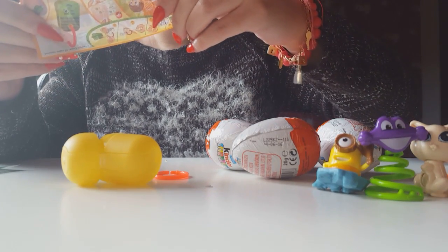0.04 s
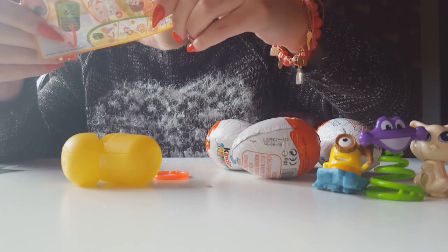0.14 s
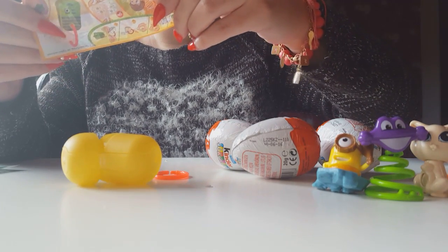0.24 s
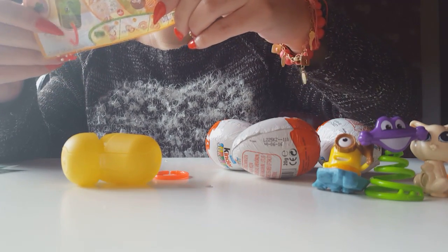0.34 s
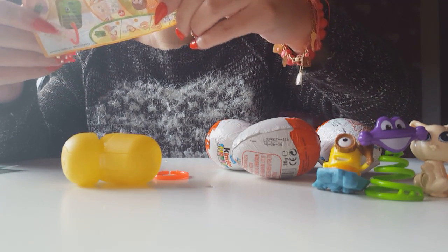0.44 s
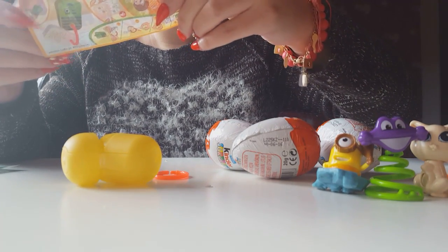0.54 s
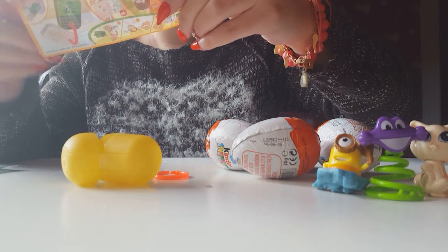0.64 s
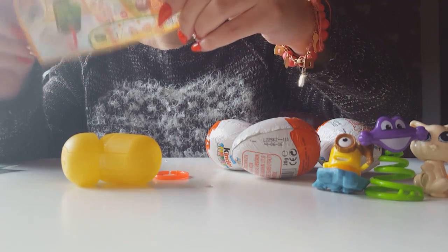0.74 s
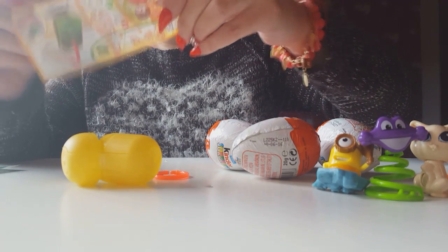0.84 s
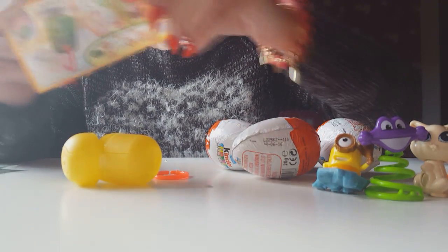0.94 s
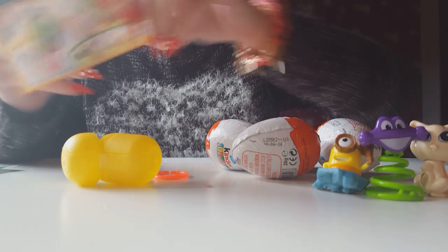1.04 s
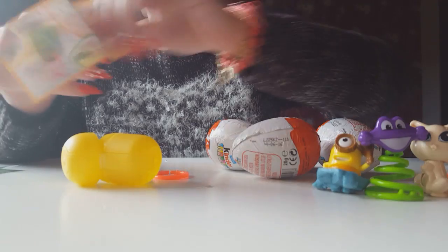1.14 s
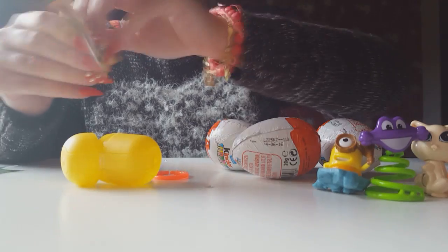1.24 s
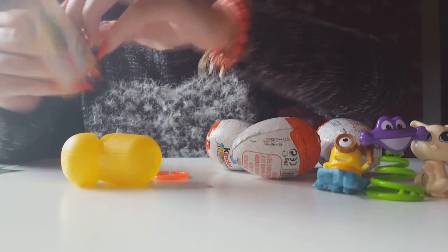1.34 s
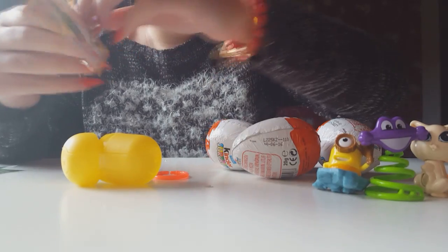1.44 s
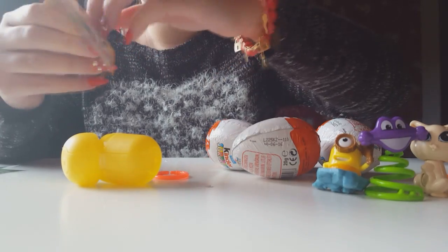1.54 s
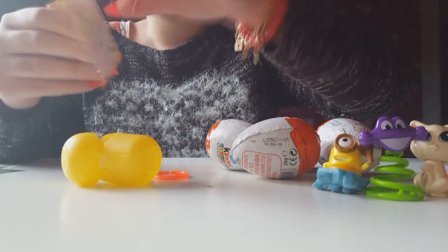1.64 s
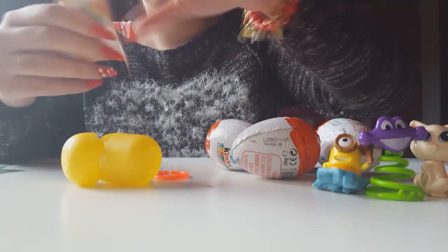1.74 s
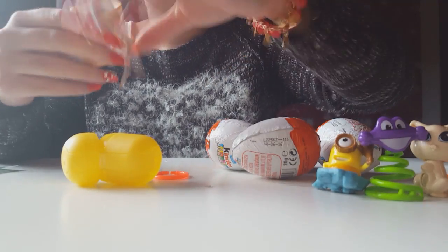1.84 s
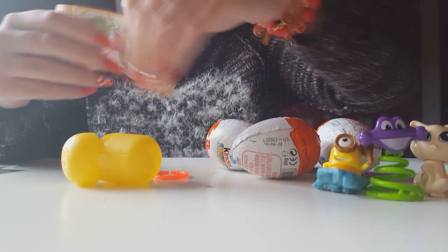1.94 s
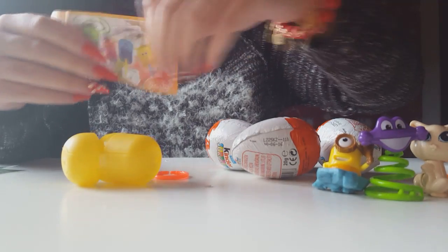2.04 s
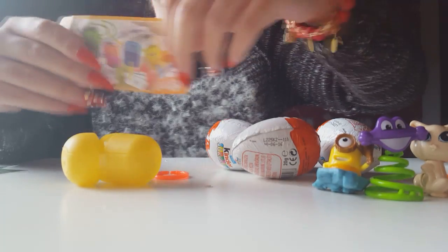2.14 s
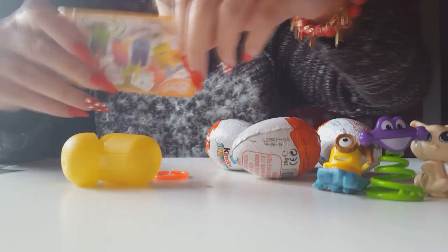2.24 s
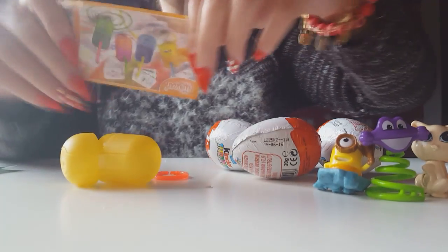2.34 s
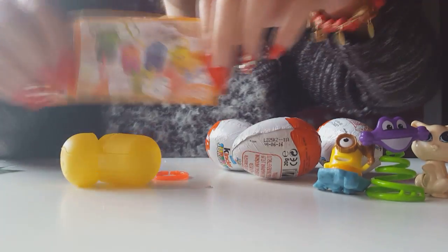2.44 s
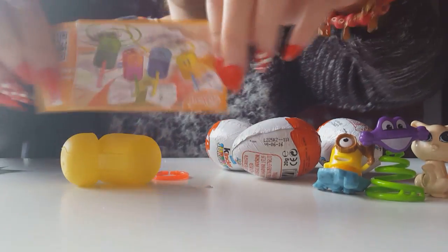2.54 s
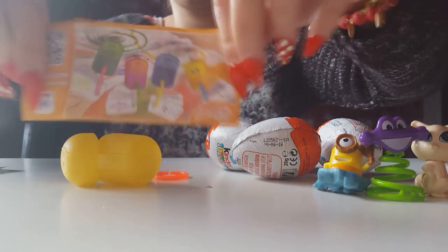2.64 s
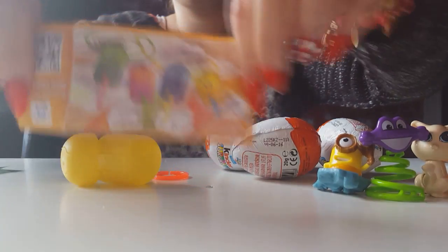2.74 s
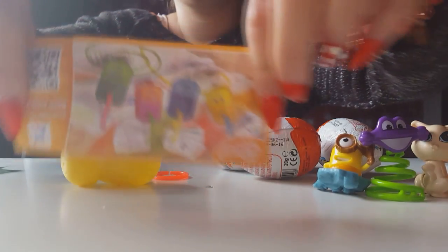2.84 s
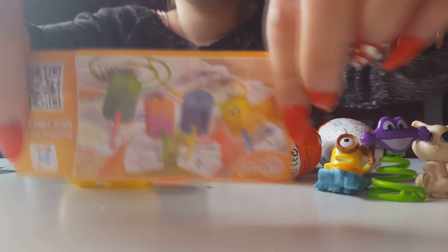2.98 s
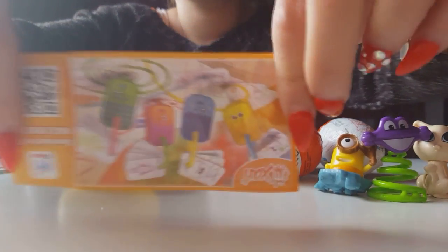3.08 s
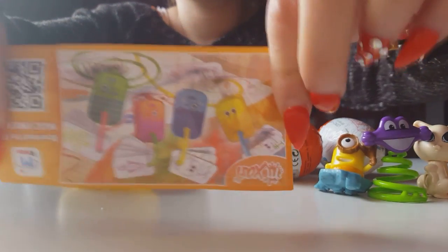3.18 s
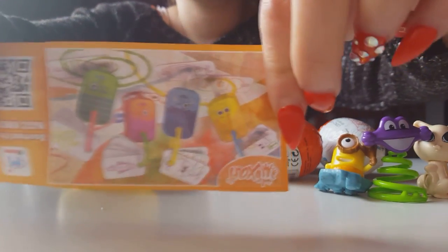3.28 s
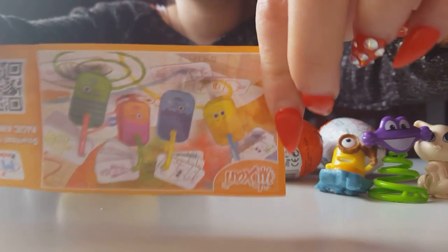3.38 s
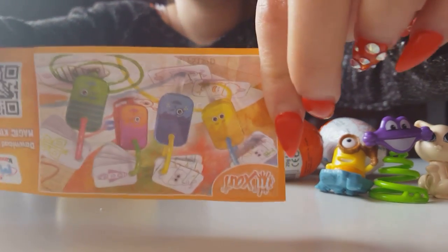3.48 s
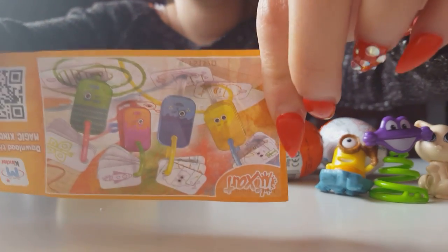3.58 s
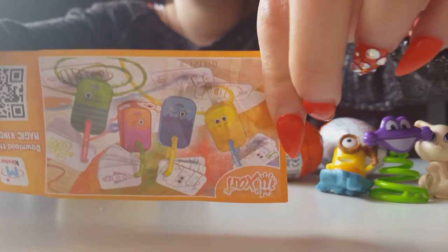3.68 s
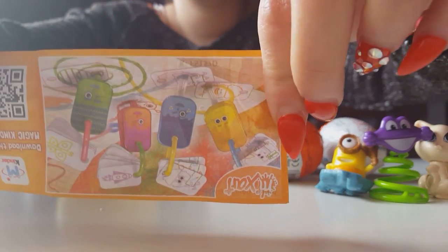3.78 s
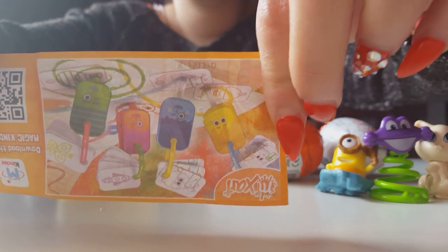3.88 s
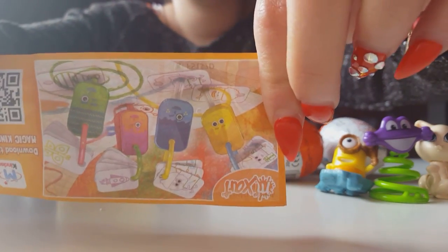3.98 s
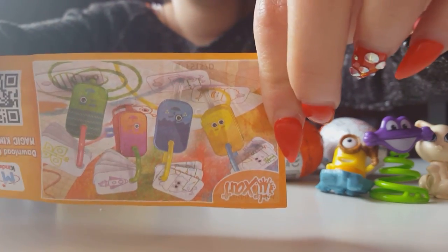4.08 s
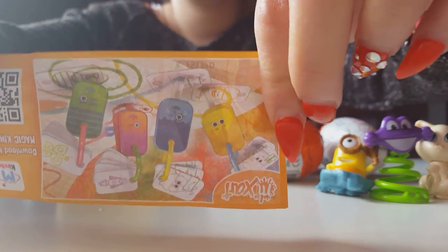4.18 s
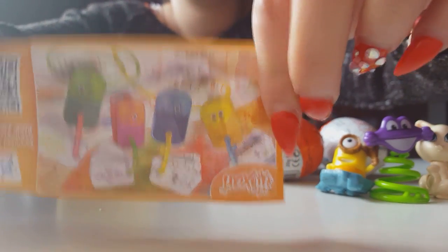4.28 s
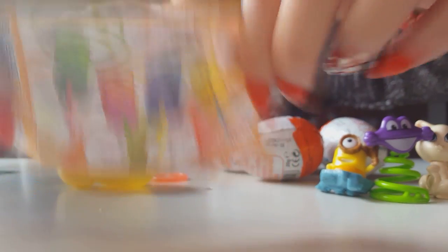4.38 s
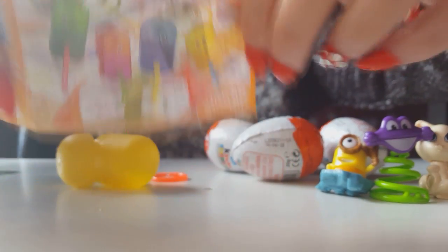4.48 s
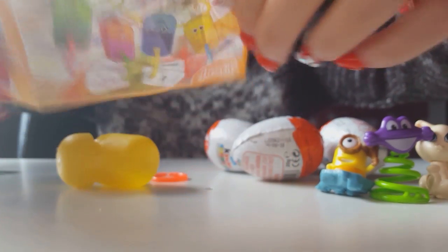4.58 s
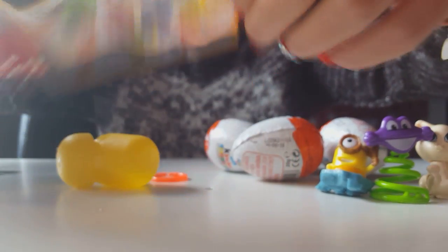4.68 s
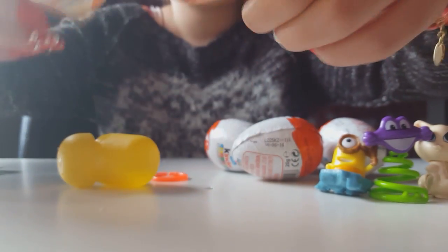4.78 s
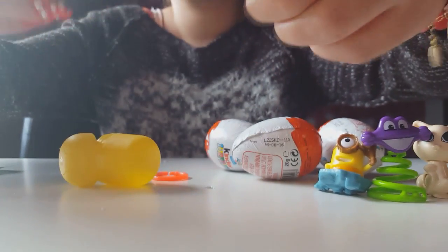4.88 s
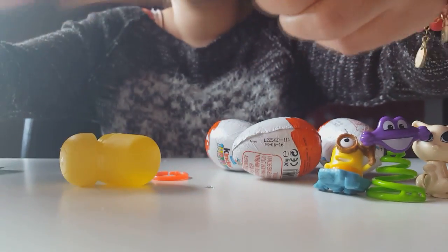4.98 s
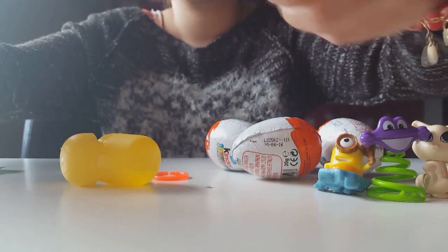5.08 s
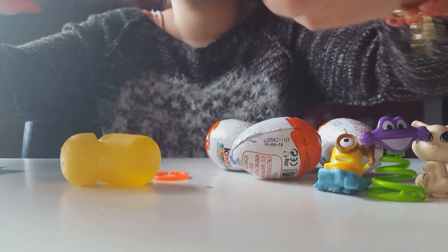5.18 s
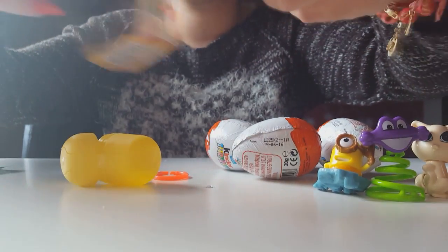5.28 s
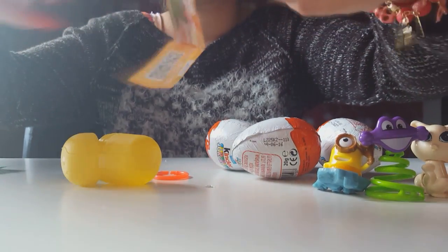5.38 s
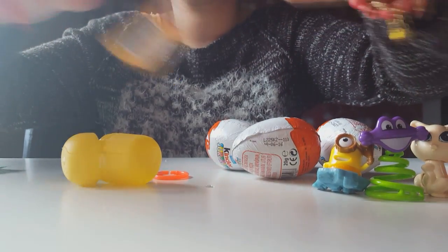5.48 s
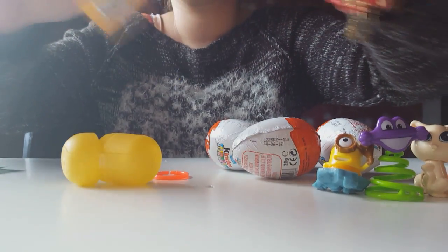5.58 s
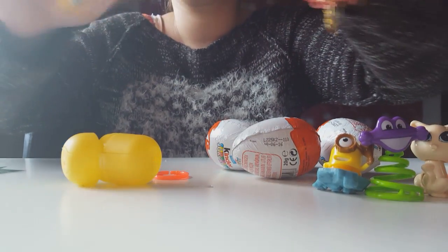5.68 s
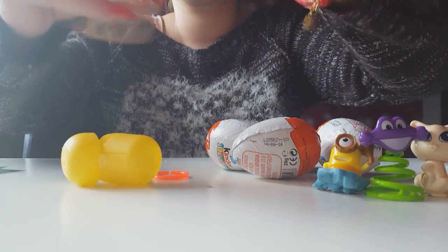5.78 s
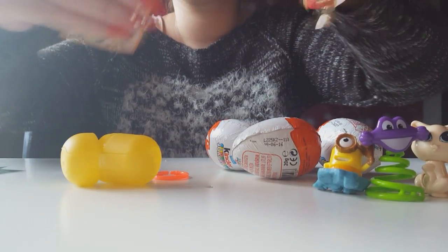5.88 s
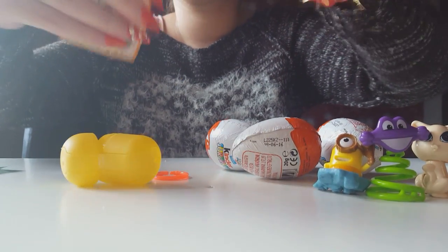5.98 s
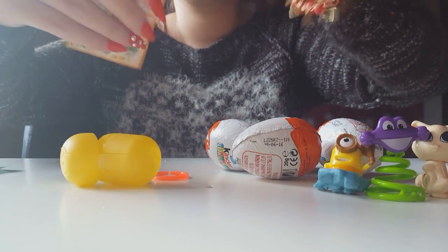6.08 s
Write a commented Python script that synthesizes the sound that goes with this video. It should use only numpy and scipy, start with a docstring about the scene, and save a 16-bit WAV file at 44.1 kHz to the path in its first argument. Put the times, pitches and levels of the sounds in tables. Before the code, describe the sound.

A small paper leaflet is handled very close to the microphone in a quiet room with faint hum, thin whine and soft air. A brief rustle and several nail taps fall in the first 0.4 s, then sparse creases. From 1.1 to 1.4 s sharp snaps cluster over light sliding, followed by thin shuffling. The loudest crackling unfold comes at about 1.9-2.2 s, with crisp pops and dull flexing, continuing in smaller crinkles to 2.9 s. Isolated taps at 3.0, 3.3 and 3.5 s break a near-still pause. At 4.3-4.8 s the sheet moves again: low thumps, firm taps and snaps, then soft rustling. Around 5.0 and 5.3 s there are faint short low resonances among small scuffs. A crisp crinkle with tiny glittering ticks, perhaps a bracelet, comes near 5.8 s, then a faint last tap. Short room and table reverberation; slight left-right movement.

```python
"""A faint hum in a quiet room, then nail taps and rustling: a small paper leaflet close to the microphone.
It is turned over, spread out, held up and laid aside. Creases snap, fingers tap and a few very bright ticks
jingle, perhaps a bracelet: short cracks and decaying noise, shaped by resonances. Between them the sheet
flexes, crinkles and slides on skin: filtered noise following the hands' strokes, with small crackles.
Two short low resonances sound late on; all this rings in the table and room, over steady hum and air."""
import sys
import numpy as np
from scipy import signal
from scipy.fft import rfft, irfft, next_fast_len
from scipy.io import wavfile
from scipy.ndimage import uniform_filter1d

SR = 44100
rng = np.random.default_rng(int(sys.argv[2]) if len(sys.argv) > 2 else 0)


def master(y):
    """Save y as 16-bit WAV."""
    cut = np.clip(np.atleast_2d(y).T, -1, 1)
    pcm = np.round(cut * 32767)  # scale
    wavfile.write(sys.argv[1], SR, pcm.astype(np.int16))


N = 269892
TIME = np.arange(N) / SR  # s
SIDES = np.array([[1], [-1]])  # signs of left and right

# Still room air, spectrum: f/Hz, density/dB (relative)
AIR_COLOUR = [(32, -13), (50, 0), (230, -2), (310, -8.5), (2800, -16.5), (6500, -29), (16000, -31)]
# Hum and whine of an appliance: f/Hz, mean level/dB
HUM_TONES = [(145.3, -70), (199.2, -76), (2073, -81.5)]
# Strokes of the hands: start t/s, length/s, level at the start/dB, flexing/dB and sliding/dB re that level
HAND_STROKES = [(-0.02, 0.025, -43, -8.5, -32), (0.926, 0.061, -55, -22, -11),
                (1.069, 0.28, -57.5, -28, -8), (1.2, 0.13, -54, -14, 0), (1.315, 0.18, -48, -15, -5),
                (1.479, 0.28, -61.5, -5.5, 2.5), (1.678, 0.058, -49, -5.5, -3.5), (1.783, 0.3, -62, -8, -3),
                (1.893, 0.028, -52.5, 7, -0.5), (1.927, 0.079, -43.5, -22, -6), (2.006, 0.053, -44, 2, -9),
                (2.067, 0.11, -39.5, -1, -2), (2.2, 0.16, -48, 1, -8.5), (2.373, 0.2, -44.5, -8, -5.5),
                (2.544, .15, -44, -1.5, -6.5), (2.801, 0.031, -49.5, 3.5, -2),
                (3.136, 0.047, -60, 4.5, -11.5), (4.392, 0.054, -49, 0, -11), (4.44, 0.08, -46, -5.5, -9.5),
                (4.585, 0.42, -55, -3, -5), (4.982, 0.14, -48, -12, -5), (5.249, 0.036, -47.5, -9, -12),
                (5.317, 0.015, -50.5, -8, -3.5), (5.791, 0.05, -42.5, -12, -12),
                (5.845, .035, -38, -5.5, -4.5), (5.881, 0.065, -46.5, -9, -5),
                (6.008, 0.078, -60, -2.5, -3)]
# Where the hands work: t/s, left minus right level/dB
HAND_PLACE = [(.2, 1), (1.12, 4), (1.22, 1.8), (1.7, -3.5), (2.05, 0), (2.85, -2.5), (3.0, 3.4), (3.29, .5),
              (4.59, 1), (4.63, 5), (5.04, -6), (5.25, 5.5), (5.8, .5)]
# Dull flexing of the sheet, spectrum: f/Hz, density/dB (relative)
FLEX_SPECTRUM = [(30, -27), (130, 2.5), (380, -3.5), (600, -33)]
# Crinkling fibres, spectrum: f/Hz, density/dB (relative)
CRINKLE_SPECTRUM = [(250, -10.5), (1050, -1.5), (2150, -2), (2650, -2), (4200, -8), (6500, -55)]
# Paper sliding on skin, spectrum: f/Hz, density/dB (relative)
SLIDE_SPECTRUM = [(2800, 4), (4600, 4), (6000, 0.5), (10000, 2), (16000, -10)]
# Fingertip or nail on the sheet: t/s, midrange level/dB, ring f/Hz, thump/dB, sparkle/dB
FINGER_TAPS = [(0.07, -44, 1020, 13, -76), (0.2083, -32.5, 3200, 5, -8.5), (0.2877, -37.5, 1590, 6.5, -21),
               (0.388, -57.5, 900, 17, -23), (1.1701, -41.5, 980, 5.5, 0), (1.7144, -37, 1370, 0, 3.5),
               (2.2828, -43, 1210, 7, -3), (2.7042, -35.5, 2570, -23, -6), (2.729, -35.5, 1069, -2, -6),
               (3.0073, -34, 1280, 1.5, -19), (3.056, -53.5, 675, 28.5, -25), (3.2926, -32, 1280, 5, -8.5),
               (3.5138, -50.5, 2500, 4, -8), (4.318, -66, 3090, 12, 12), (4.3611, -47, 1220, 16, -35),
               (4.409, -42, 695, 22, -27), (4.47, -44, 900, 22, 12), (4.5941, -33, 2100, 1, -0.5),
               (4.6253, -29, 1540, -2.5, -3.5), (4.7077, -43.5, 1100, 18.5, 16.5),
               (4.797, -42.5, 1400, -3, -4), (6.1155, -49.5, 2362, -16, 5)]
# Creases and a few very bright ticks, perhaps a bracelet (those with sparkle near 30 dB):
# t/s, midrange level/dB, ring f/Hz, length/s, sparkle/dB
SNAPS_AND_TICKS = [(0.461, -40.5, 1440, 0.0042, -1.5), (0.862, -43, 1970, 0.0043, 5.5),
                   (1.124, -36.5, 1960, 0.003, -2), (1.178, -41.5, 2480, 0.0053, -11),
                   (1.2025, -31.5, 1480, 0.005, 10.5), (1.219, -28.5, 1440, 0.0023, 15),
                   (1.2227, -32, 1600, 0.0056, 16), (1.317, -42, 1090, 0.008, 8),
                   (1.343, -38, 1931, 0.006, -3), (1.3608, -37.5, 1760, 0.0015, -23),
                   (1.41, -45.5, 1420, 0.0079, 17), (1.436, -46.5, 1380, 0.0078, 15),
                   (1.5547, -57, 1200, 0.002, 29), (1.611, -43.5, 1390, 0.007, -7),
                   (1.9403, -35.5, 1530, 0.0038, 8), (2.0124, -36.5, 1300, 0.0045, 27.5),
                   (2.0178, -27.5, 940.5, 0.0022, 8), (2.0317, -42.5, 2000, 0.0024, 29),
                   (2.0797, -24.5, 1010, 0.0028, 14), (2.092, -21.5, 910, 0.0046, 12),
                   (2.1464, -23, 3900, 0.00088, -1.5), (2.21, -34, 1660, 0.0046, 3),
                   (2.374, -35.5, 1624, 0.0021, 10.5), (2.415, -36, 1100, 0.0027, 1),
                   (2.452, -42.5, 1900, 0.0016, 0), (2.47, -40.5, 1990, 0.0018, 2),
                   (2.5426, -36.5, 2300, 0.0014, 4), (2.5482, -31.5, 1380, 0.014, -4),
                   (2.576, -39, 1550, 0.00081, 10), (2.606, -36, 1420, 0.0045, 3),
                   (2.807, -40, 1293, 0.0052, 4), (2.8187, -37.5, 890, 0.018, -8),
                   (2.8525, -25, 1340, 0.0015, 13.5), (3.938, -77.5, 2900, 0.0017, 34.5),
                   (4.4513, -44.5, 1870, 0.0023, 8.5), (4.5126, -37.5, 770, 0.0038, 5),
                   (4.7406, -38, 1330, 0.0035, -5), (4.8824, -52.5, 1500, 0.003, -5),
                   (4.9638, -47, 950, 0.0013, 3.5), (5.0368, -44.5, 1212, 0.0029, 30.5),
                   (5.098, -48.5, 1920, 0.0023, -6), (5.251, -40, 1020, 0.0056, 0),
                   (5.288, -50.5, 1300, 0.0029, 22), (5.411, -43, 2183, 0.02, -11),
                   (5.617, -44.5, 1430, 0.019, -1.5), (5.789, -39, 1800, 0.0052, 14),
                   (5.827, -45, 1796, 0.0029, 27.5), (5.833, -45, 1800, 0.0026, 31),
                   (5.8447, -38, 1530, 0.0048, 13)]
# Colour shared by snaps, ticks, taps and crackles: f/Hz, gain/dB (relative)
CRACK_COLOUR = [(40, -17), (130, -0.5), (380, -3), (900, 6), (1500, 1.5), (2200, -5.5), (2650, -4.5),
                (3200, -10.5), (4500, -16.5), (5800, -22), (11000, -31), (15500, -48.5)]
# Short low resonances, a dull table-like ring near 500 Hz and a rub near 650 Hz:
# t/s of the peak, f/Hz, Gaussian spread/s, level/dB
LOW_RESONANCES = [(5.028, 503, 0.027, -50.5), (5.311, 650, 0.031, -52)]
# Likeness of left and right, close sounds: f/Hz, coherence/1
CLOSE_LIKENESS = [(1200, .93), (3200, .55), (12000, 0)]
# Likeness of left and right, room sound: f/Hz, coherence/1
DIFFUSE_LIKENESS = [(200, 0.89), (1000, 0)]
# Reverberant tail, spectrum: f/Hz, gain/dB (relative)
TAIL_COLOUR = [(50, 16), (120, 4.5), (250, 4), (15000, -2.5)]
# Reverberation time: f/Hz, t60/s
REVERB_T60 = [(120, 0.31), (1000, 0.31), (14000, 0.19)]
# Ring of the table top, response to a unit impulse: f/Hz, level/dB, t60/s
TABLE_RINGS = [(522, -58, 0.34)]

AIR_DB, HUM_WAVER_DB = -62, 1.5
# each stroke takes hold, eases off while it lasts, and dies away
ATTACK_S, EASE_DB_PER_S, RELEASE_DB_PER_S = 0.0033, 21, 267.5
RESTING_DB = -86  # crinkling level between strokes
FIBRE_DB = -4  # fine crinkle relative to the stroke
CATCH_SPREAD_DB = 8
# small creases give way at random; their level is relative to the stroke
CRACKLES_PER_S, CRACKLE_DB, CRACKLE_SPREAD_DB = 55, -6, 3
CRACKLE_S, CRACKLE_SPARKLE_DB, CRACKLE_OCTAVES = 0.0012, -7, 0.6
# the left side hears the sheet slightly later, less so as the hands move left
MIC_LAG_S, LAG_S_PER_DB = 0.00005, 0.00002
# a small panel rings higher and crisper; a sharp break lifts the upper midrange with the sparkle
PANEL_HZ, CRISP_DB, CRISP_DB_PER_OCTAVE, CRISP_PER_SPARKLE = 1370, 5.0, 7.5, 0.45
# the finger damps the panel it taps: main ring, lesser rings, and weight of the first crack
TAP_S, TAP_RING_DB, TAP_RIPPLE_DB, TAP_CRACK = 0.0022, 2, 1.5, 34
# thump of a snap as short as a tap, and its rise with length
SNAP_THUMP_DB, THUMP_DB_PER_DOUBLING = -8.5, 5
CUTOFF_HZ = 16200


def from_db(db):
    """Decibels to amplitude gain."""
    return 10 ** (np.asarray(db) / 20)


def rms_one(x):
    """Scale to unit power."""
    return x / np.sqrt(np.mean(x ** 2) + 1e-20)


def at_hz(points, hz):
    """Read a table along a log-frequency axis."""
    knots, values = np.transpose(points)
    return np.interp(np.log(hz + 1), np.log(knots), values)


def bins(size):
    """Frequencies of a spectrum in Hz."""
    return np.fft.rfftfreq(size, 1 / SR)


def causal(gain_db):
    """Minimum-phase response with these gains: nothing sounds before its cause."""
    cepstrum = irfft(np.log(from_db(gain_db)))
    half = len(cepstrum) // 2
    cepstrum[1:half] *= 2
    cepstrum[half + 1:] = 0
    return np.exp(rfft(cepstrum))


def coloured(x, colour, size=4096):
    """Filter a stereo signal by a colour table."""
    response = irfft(causal(at_hz(colour, bins(size))))
    return signal.fftconvolve(x, response[None], axes=1)[:, :x.shape[1]]


def stereo_noise(likeness, size):
    """White noise whose two sides agree by frequency, mixed from a shared and an opposed part."""
    padded = next_fast_len(size, True)
    mid, side = rfft(rng.standard_normal((2, padded)))
    alike = np.clip(at_hz(likeness, bins(padded)), -1, 1)
    shared = np.sqrt((1 + alike) / 2) * mid
    opposed = np.sqrt((1 - alike) / 2) * side
    return irfft(shared + opposed * SIDES, padded)[:, :size]


def flutter(per_s):
    """Random unevenness: values of spread 1 drawn so many times a second, joined by straight lines."""
    steps = rng.standard_normal(N // 16)
    return np.interp(TIME * per_s, np.arange(len(steps)), steps)


def background():
    """Still room air as diffuse noise, and an appliance's slightly wavering tones."""
    noise = coloured(stereo_noise(DIFFUSE_LIKENESS, N), AIR_COLOUR)
    air = from_db(AIR_DB) * rms_one(noise)
    hum = 0
    for hz, db in HUM_TONES:
        level = np.sqrt(2) * from_db(db + HUM_WAVER_DB * flutter(6.8))
        hum = hum + level * np.sin(2 * np.pi * (hz * TIME + rng.random()))
    return air + hum


def handling():
    """Levels in dB of crinkling, flexing and sliding: in each stroke they share one envelope."""
    power = np.zeros((3, N))
    power[0] = from_db(RESTING_DB) ** 2
    for start, length, db, flex_db, slide_db in HAND_STROKES:
        near = (TIME > start) & (TIME < start + length + 0.5)
        age = TIME[near] - start
        falling_db = db - EASE_DB_PER_S * age - RELEASE_DB_PER_S * np.maximum(age - length, 0)
        gain = np.minimum(age / ATTACK_S, 1) * from_db(falling_db)
        power[:, near] += np.outer(from_db([0, flex_db, slide_db]), gain) ** 2
    return 10 * np.log10(power + 1e-14)


def friction(colour, level_db, grain_db, catch_db, catches_per_s=58, catch_s=0.0082):
    """Countless tiny slips; now and then the paper catches and lets go with a burst that dies at once."""
    caught = rng.random(N) < catches_per_s / SR
    strength_db = catch_db + CATCH_SPREAD_DB * np.clip(rng.standard_normal(N), -2, 1)
    catches = caught * from_db(strength_db)
    bursts = signal.lfilter([1], [1, -np.exp(-1 / (catch_s * SR))], catches + 1e-18)
    grain = from_db(grain_db * np.minimum(flutter(2000), 2))
    slips = rms_one((1 + bursts) * grain)
    noise = coloured(stereo_noise(CLOSE_LIKENESS, N) * slips * from_db(level_db), colour)
    # undo the overall gain of the colour
    return noise / np.sqrt(np.mean(from_db(at_hz(colour, bins(N))) ** 2))


def bending(x, swing_db=-1.5, changes_per_s=16, sharpness=14, count=18):
    """As the sheet bends, its narrow resonances come and go."""
    out = x
    for hz in np.geomspace(480, 4800, count) * np.exp(rng.normal(0, 0.028, count)):
        mode = signal.lfilter(*signal.iirpeak(hz, sharpness, fs=SR), x)
        gain = from_db(swing_db * np.minimum(flutter(changes_per_s), 2))
        out = out + mode * (gain - 1)
    return out * np.std(x) / np.std(out)


def evened(spectrum, over_hz=700):
    """Level the broad tilt of a spectrum and keep its fine ripple."""
    power = np.mean(np.abs(spectrum) ** 2, axis=0)
    return spectrum / np.sqrt(uniform_filter1d(power, int(2 * over_hz / SR * len(power))))


def arrival(s, hz):
    """The sound reaches the two sides at slightly different times, as phase over frequency."""
    scatter = 1 + np.clip(rng.normal(), -1, 1) / 2
    lag = MIC_LAG_S * scatter - LAG_S_PER_DB * np.interp(s, *np.transpose(HAND_PLACE))
    return np.exp(-2j * np.pi * hz * (2 * MIC_LAG_S + lag / 2 * SIDES))


def panel(hz, ring_hz, ring_db, ripple_db, ring_width=0.1):
    """Gain in dB of a free panel: one broad resonance, and lesser ones drawn anew for every event."""
    main = ring_db / (1 + (np.log((hz + 1) / ring_hz) / ring_width) ** 2)
    low_cut = ring_db / 2 * np.exp(-(hz / ring_hz / 2) ** 2)
    size = 2 * (len(hz) - 1)
    lesser = ripple_db * np.interp(np.sqrt(hz) / 2, np.arange(size), rng.standard_normal(size))
    return main - low_cut + lesser


def cracks(events, crack, ring_db, ripple_db=7.0, ring_up_s=0.00029, build=0.15, size=2048):
    """Each event is one sharp crack and a burst of decaying noise, like bending waves crossing a sheet."""
    out, hz, age = np.zeros((2, N + size)), bins(size), np.arange(size) / SR
    midrange = (hz > 400) & (hz < 2000)
    fade = np.cos(np.linspace(0, np.pi / 2, size)) ** 2
    for s, db, ring_hz, length, thump_db, sparkle_db in events:
        length = max(length, age[10])
        progress = age / length
        envelope = np.exp(-progress) * (1 - np.exp(-progress / build))
        waves = stereo_noise(CLOSE_LIKENESS, size) * envelope
        # the crack is strongest when the event is short, and weighs most in the treble
        impulse = crack * (1 + hz / ring_hz / 2) * np.sqrt(progress[1])
        strike = (impulse + rfft(waves)) * arrival(s, hz)
        bite_db = CRISP_DB + CRISP_DB_PER_OCTAVE * np.log2(ring_hz / PANEL_HZ) + CRISP_PER_SPARKLE * sparkle_db
        tone = [(170, thump_db), (600, 0.0013), (1500, 0.00066), (4500, bite_db),
                (9000, sparkle_db), (14000, 1.17 * sparkle_db)]
        # a very short event barely wakes the panel
        panel_db = panel(hz, ring_hz, ring_db, ripple_db) / (1 + (ring_up_s / length) ** 2)
        spectrum = evened(strike) * causal(at_hz(CRACK_COLOUR, hz) + at_hz(tone, hz) + panel_db)
        # level is the midrange power over a hundredth of a second
        power = np.sum(irfft(spectrum * midrange) ** 2) / 2 / (0.01 * SR)
        start = int(s * SR)
        out[:, start:start + size] += irfft(spectrum) / np.sqrt(power) * from_db(db) * fade
    return out[:, :N]


def crackles(crinkling):
    """Each stroke sheds small snaps at uneven moments, following its level; a longer stroke sheds more."""
    times = []
    for start, length, *_ in HAND_STROKES:
        count = 2 + int(CRACKLES_PER_S * length)
        times.extend(start + length * (np.arange(count) + rng.random(count)) / count)
    chance = np.clip(rng.standard_normal((len(times), 3)), -2, 2)
    events = []
    for s, (strength, pitch, sharpness) in zip(np.clip(times, 0, TIME[-1]), chance):
        db = crinkling[int(s * SR)] + CRACKLE_DB + CRACKLE_SPREAD_DB * strength
        ring_hz = PANEL_HZ * 2 ** (CRACKLE_OCTAVES * pitch)
        sparkle_db = CRACKLE_SPARKLE_DB + CRACKLE_SPREAD_DB * sharpness
        events.append((s, db, ring_hz, CRACKLE_S, SNAP_THUMP_DB, sparkle_db))
    return cracks(events, crack=17, ring_db=TAP_RING_DB, size=1024)


def rustle():
    """The sheet flexes dully, its fibres crinkle and crackle, and fingers slide over it with a fine hiss."""
    crinkling, flexing, sliding = handling()
    flex = friction(FLEX_SPECTRUM, flexing, grain_db=0.0, catch_db=4)
    crinkle = friction(CRINKLE_SPECTRUM, crinkling + FIBRE_DB, grain_db=1.0, catch_db=4,
                       catches_per_s=110, catch_s=0.003)
    slide = friction(SLIDE_SPECTRUM, sliding, grain_db=2.5, catch_db=2.5)
    return flex + bending(crinkle) + slide + crackles(crinkling)


def room(x, wet_db=-14.5, first_echo_s=0.0017, size=24000):
    """The table's decaying ring and a diffuse tail that dies sooner in the treble."""
    age, hz = np.arange(size) / SR, bins(size)
    noise, tail = rfft(stereo_noise(DIFFUSE_LIKENESS, size)), 0
    edges = np.append(0, np.geomspace(180, SR / 2, 10))
    for low, high in zip(edges, edges[1:]):
        t60 = at_hz(REVERB_T60, (low + high) / 2)
        band = irfft(noise * ((hz >= low) & (hz < high)))
        tail = tail + band * from_db(-60 * age / t60)
    tail = tail * np.clip(age / first_echo_s - 1, 0, 1)
    tail = from_db(wet_db) * coloured(tail / np.sqrt(np.sum(tail ** 2) / 2), TAIL_COLOUR)
    table = 0
    for mode_hz, db, t60 in TABLE_RINGS:
        table = table + from_db(db - 60 * age / t60) * np.sin(2 * np.pi * mode_hz * age)
    return signal.fftconvolve(x, tail + table, axes=1)[:, :N]


def taps():
    """Fingertips and nails strike the sheet: all equally short, they push the whole sheet and damp its ring."""
    events = [(s, db, hz, TAP_S, thump_db, sparkle_db) for s, db, hz, thump_db, sparkle_db in FINGER_TAPS]
    return cracks(events, crack=TAP_CRACK, ring_db=TAP_RING_DB, ripple_db=TAP_RIPPLE_DB)


def snaps_and_ticks():
    """Creases snap and a few very bright ticks sound among them: the longer each lasts, the more it thumps."""
    events = []
    for s, db, hz, length, sparkle_db in SNAPS_AND_TICKS:
        thump_db = SNAP_THUMP_DB + THUMP_DB_PER_DOUBLING * np.log2(length / TAP_S)
        events.append((s, db, hz, length, thump_db, sparkle_db))
    return cracks(events, crack=7.4, ring_db=8, ripple_db=3.5)


def low_resonances(width_hz=110):
    """A dull table-like ring and a higher rub: noise through one resonance each, swelling and fading."""
    out = 0
    for s, hz, spread, db in LOW_RESONANCES:
        ringing = signal.lfilter(*signal.iirpeak(hz, hz / width_hz, fs=SR), rng.standard_normal(N))
        swell = np.exp(-((TIME - s) / spread) ** 2 / 2)
        out = out + from_db(db) * rms_one(ringing) * swell
    return out


def scene():
    """The leaflet and the hands close by, placed left to right by level, in their room."""
    balance = from_db(np.interp(TIME, *np.transpose(HAND_PLACE)) / 2 * SIDES)
    close = (rustle() + taps() + snaps_and_ticks() + low_resonances()) * balance
    return background() + close + room(close)


def record(dry):
    """A steep low-pass takes off the top of the treble."""
    return signal.sosfilt(signal.ellip(10, 0.2, 80, CUTOFF_HZ, fs=SR, output="sos"), dry)


dry = scene()
out = record(dry)
master(out)
```